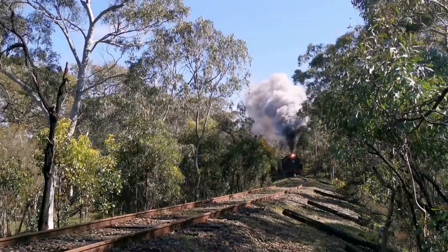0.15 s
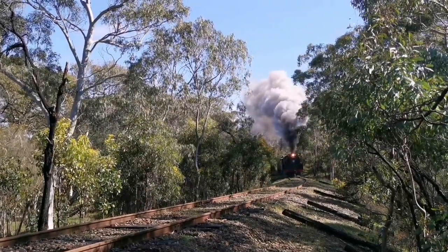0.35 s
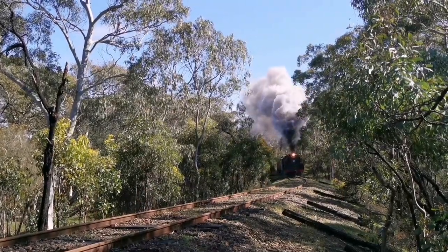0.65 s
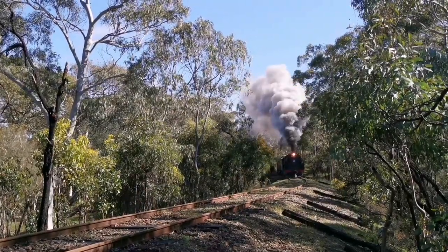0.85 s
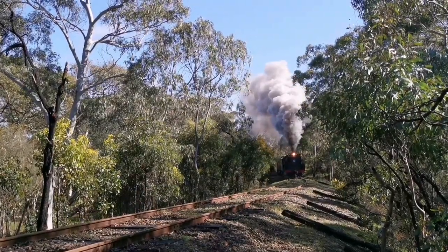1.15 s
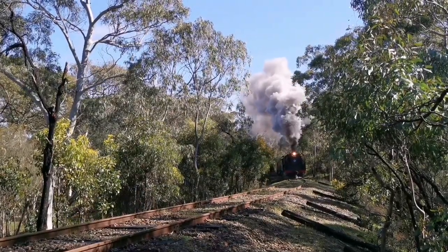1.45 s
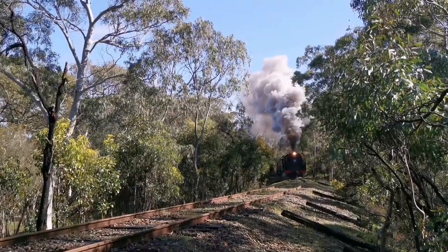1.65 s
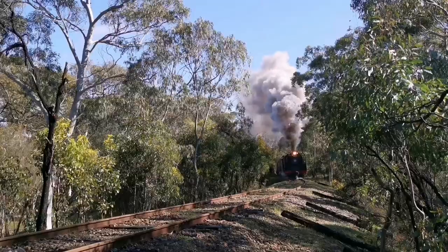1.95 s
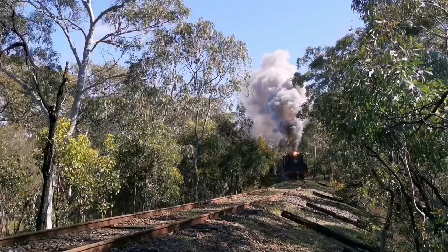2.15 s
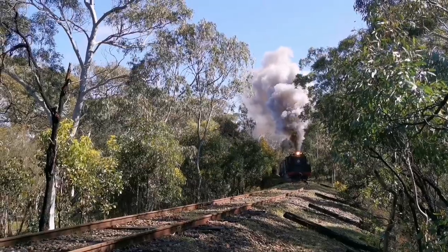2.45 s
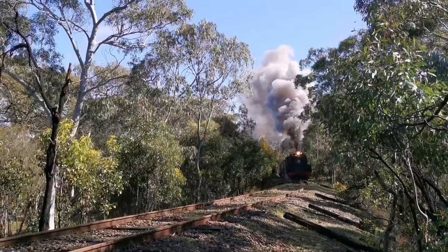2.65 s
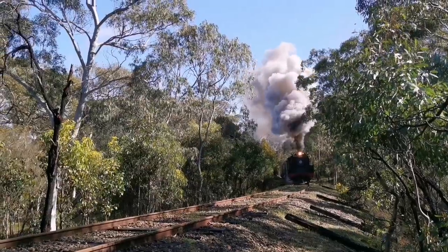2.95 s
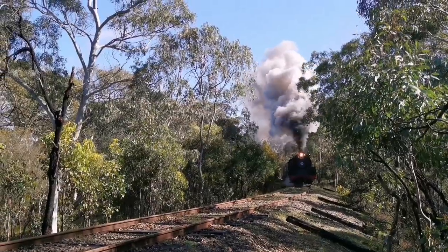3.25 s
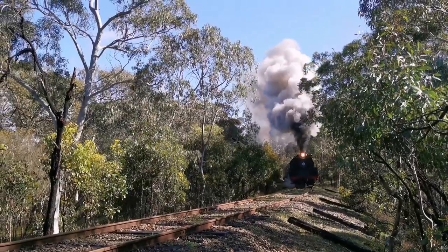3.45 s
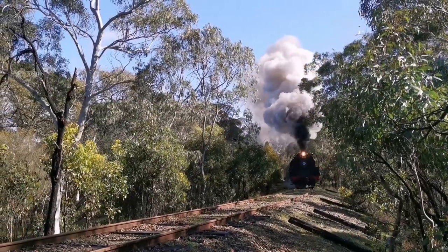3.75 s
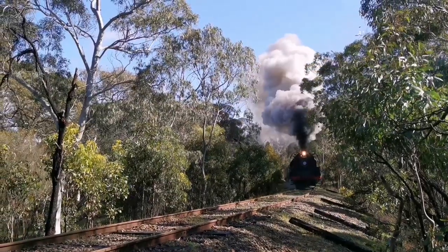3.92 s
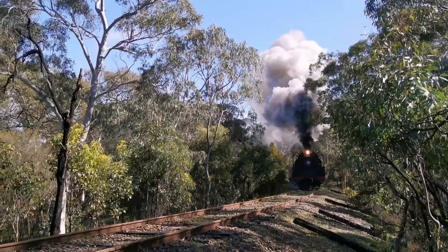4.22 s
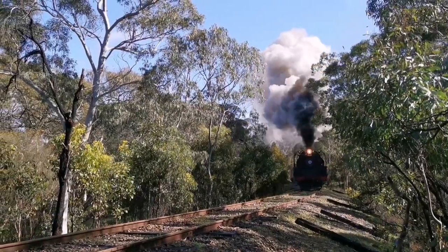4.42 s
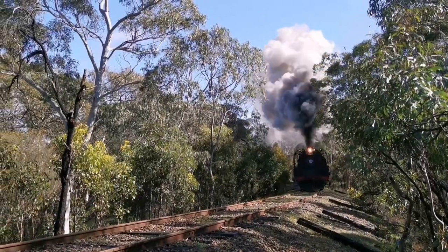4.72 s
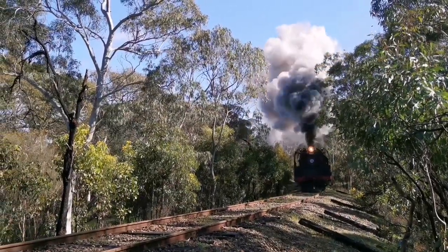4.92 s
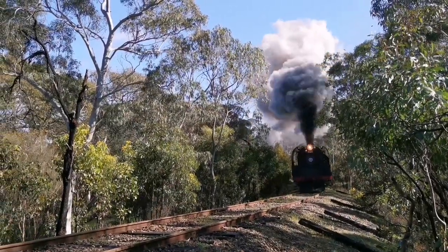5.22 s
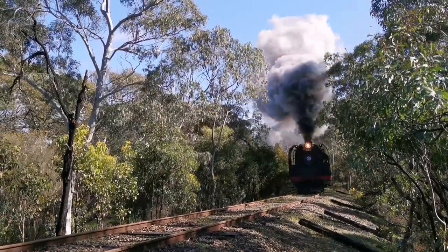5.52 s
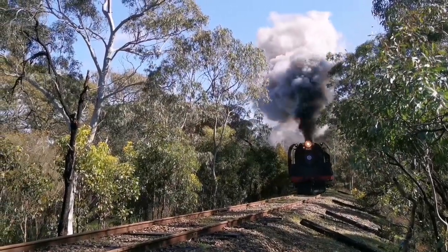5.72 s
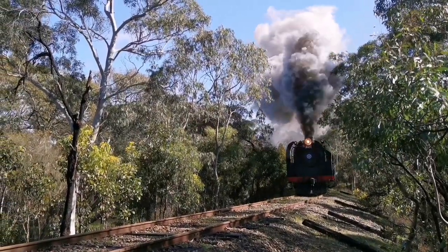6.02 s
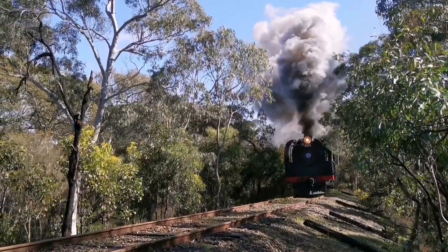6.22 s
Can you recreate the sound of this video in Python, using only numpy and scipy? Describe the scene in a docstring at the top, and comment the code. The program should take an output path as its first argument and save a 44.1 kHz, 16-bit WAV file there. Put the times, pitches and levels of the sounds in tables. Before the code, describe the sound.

Fast, breathy steam exhaust beats with hollow chimney booms, every second of four slightly weaker, slowly growing louder above low train rumble in woodland.

```python
"""A steam locomotive works up a grade towards the microphone beside a wooded line: 5.5 exhaust beats a second,
four to a turn of the wheels with the second one weak.
Each beat is a rush of steam (gated, filtered noise) and a boom of the smokebox and chimney (ringing noise and a
sine note). The bush answers with decaying noise echoes; the train rumbles and roars underneath, with a few thumps.
Reflections off the ground and trunks ripple the steam's spectrum, and its hiss leans to the right."""
import sys
import numpy as np
from scipy import signal
from scipy.fft import rfft, irfft, next_fast_len
from scipy.io import wavfile
from scipy.ndimage import uniform_filter1d, map_coordinates

SR = 44100
rng = np.random.default_rng(int(sys.argv[2]) if len(sys.argv) > 2 else 0)


def to_wav(sig):
    """Store sig (one row per channel, or 1-D mono) as 16-bit WAV at the path in sys.argv[1].

    Samples outside -1..1 are clipped; the rate is SR.
    """
    pcm = np.clip(np.atleast_2d(sig), -1, 1) * 32767
    pcm = np.round(pcm).astype(np.int16)
    wavfile.write(sys.argv[1], SR, pcm.T)  # frames by channels


N = 280910  # length in samples

# The four beats of one wheel turn, unequal as the valves are set; levels are before the mix gains:
# (lateness t/s, valve opening t/s, full blast t/s, blast level/dB, extra hiss level/dB,
#  delay of the boom t/s, boom level/dB)
STROKES = [(-.001, 0.03606, 0.026, -31.5, 0.75, 0.046, -33.5),
           (-.0067, 0.0376, 0.03, -34, -2.5, 0.047, -35), (.002, 0.0378, 0.028, -32, 0.74, 0.051, -33.5),
           (-.0006, 0.03244, .025, -33, 0.7, 0.046, -34)]
# Beats that stand out from the pattern: (t/s, extra blast level/dB, extra hiss level/dB, extra boom level/dB)
ACCENTS = [(.54, -0.4, 1, 1), (.9, -2.3, 0.8, -4.5), (1.08, 1.9, -1.1, 1.5), (3.07, -2, 0, 1.5),
           (4.16, -1.5, 1, 0.5), (4.34, -1.1, 1.2, -4.5), (5.06, -3.1, 4, 1), (5.24, -0.6, 1.8, -5.5)]
# How hard the steam blows: (t/s, added blast level/dB)
EFFORT = [(0, 0), (2.2, 0.42), (4.2, 0), (5.6, 1), (6.37, 0.6)]
# Steam spectrum common to both ears, and differing between them: (f/Hz, relative level/dB per Hz)
BLAST_MID = [(300, -19), (700, -2), (1200, -8), (1900, -4), (3000, -20), (4300, -22), (5600, -14),
             (6900, -24), (7700, -38), (11000, -33), (12300, -49.5), (13000, -65)]
BLAST_SIDE = [(300, -35), (700, -14.5), (1200, -5), (1900, -11.5), (3000, -13.5), (4300, -17.5),
              (5600, -16.5), (6900, -27.5), (7700, -38), (11000, -32.5), (12300, -49), (13000, -65)]
# Peaks and notches from near reflections, same two parts: (centre f/Hz, half-width at 1/e f/Hz, level/dB)
RIPPLE_MID = [(976, 72.6, -17.5), (1172, 117, 4.5), (1603, 28.5, -34), (2190, 233, -5.5), (2436, 78, 7.5),
              (2836, 100, 8.5), (2856, 47, -9), (3390, 44, 6), (5000, 110, -1.5)]
RIPPLE_SIDE = [(1010, 180, -7), (1354, 61, -17), (1590, 150, 2), (1810, 61, -8.9), (2095, 74, -9),
               (2290, 96, 7), (2500, 44, -15), (3140, 380, 3)]
# Sideways lean of the steam: (f/Hz, pull to the left, negative to the right, limited to +-0.99 in use)
LEAN = [(200, 0.68), (400, 0.97), (700, -1.1), (1200, 0.77), (1600, -0.28), (1900, 0.43), (2500, 0.33),
        (3400, 0.036), (4200, -0.23), (4900, -.63), (5600, -0.99), (7000, -0.83), (8000, -1.02)]
# Smokebox and chimney resonances: (f/Hz, bandwidth f/Hz, relative level/dB)
CHIMNEY = [(153.7, 43, -9.5), (200.8, 17.15, -2), (232.9, 13, -6.5)]
# Dying away of the answer from the trees: (f/Hz, time to fall 60 dB t/s)
BUSH_DECAY = [(150, 0.73), (700, 0.88), (2500, 0.48), (10000, 0.61)]
# Spectra of the rolling train: (f/Hz, relative level/dB per Hz)
RUMBLE = [(12, -32), (26, 1), (40, -7), (70, -2), (115, -5.5), (170, -6), (290, -20), (450, -67.5)]
ROAR = [(200, -17), (320, 2.5), (420, 5.5), (700, 5.5), (850, 3), (970, -2), (1200, -7), (1900, -5.5),
        (3000, -11), (6000, -18.5), (8000, -48)]
# Dull low thumps: (onset t/s, peak level/dB, f/Hz)
THUMPS = [(0.978, -24.5, 85.5), (1.64, -21.5, 80.5), (5.282, -28, 75.6)]

BEAT_S = 0.18078  # steady time from one exhaust beat to the next
# no two beats are quite alike: standard deviations
SCATTER_S, BLAST_SCATTER_DB, HISS_SCATTER_DB, BOOM_SCATTER_DB = 0.00092, 0.3, 0.95, 0.5
OPENING_SCATTER = 0.158  # share by which a valve opens faster or slower than usual
NOTE_HZ, NOTE_SCATTER = 202.85, 0.034  # hollow chimney note, and the share by which it varies between beats
# growth of each sound as the engine nears
HISS_DB_PER_S, BOOM_DB_PER_S, RUMBLE_DB_PER_S, ROAR_DB_PER_S = 0.19, 1.37, 0.49, 0.89
RUMBLE_START_DB, ROAR_START_DB = -38, -48
TOP_HZ = 15700  # upper band limit at the microphone


def beats():
    """The four strokes come round with the wheels; returns the steam puffs and the booms that follow them."""
    puffs, booms = [], []
    accents = {round(s / BEAT_S): extra for s, *extra in ACCENTS}
    count = int(N / SR / BEAT_S) + 1
    for k, (jitter, strong, bright, deep, slow) in enumerate(rng.standard_normal((count, 5))):
        late, rise, hold, db, hiss_db, delay, boom_db = STROKES[k % len(STROKES)]
        db, hiss_db, boom_db = np.add((db, hiss_db, boom_db), accents.get(k, 0))
        half_open = k * BEAT_S + late + SCATTER_S * jitter
        rise = rise * np.exp(OPENING_SCATTER * slow)
        start = half_open - rise / 2
        db = db + np.interp(half_open, *np.transpose(EFFORT)) + BLAST_SCATTER_DB * strong
        hiss_db = hiss_db + HISS_DB_PER_S * half_open + HISS_SCATTER_DB * bright
        boom_db = boom_db + BOOM_DB_PER_S * half_open + BOOM_SCATTER_DB * deep
        puffs.append((start, rise, hold, db, hiss_db))
        booms.append((start, delay + rise / 2, boom_db))
    return puffs, booms


def exhaust(puffs, fall_db_per_s, leak_db):
    """Strength of the jet and of its hiss: each valve opening rises, holds and dies away over a steady leak."""
    t = np.arange(N) / SR
    power, hiss_power = np.zeros((2, N)) + amp(leak_db) ** 2
    for s, rise, hold, db, hiss_db in puffs:
        closing_s = np.maximum(t - s - rise - hold, 0)
        flow = np.clip((t - s) / rise, 0, 1) * amp(db - fall_db_per_s * closing_s)
        power = power + flow ** 2
        hiss_power = hiss_power + (flow * amp(hiss_db)) ** 2
    return np.sqrt(power), np.sqrt(hiss_power)


def blast(flow, hiss, flutter_db, clearing_db_per_s, diffuse, wet_db):
    """The turbulent jet of steam leaves the chimney and reaches both ears."""
    t = np.arange(N) / SR

    def treble(hz):
        return hz ** 4 / (hz ** 4 + 3800 ** 4)

    def body(hz):  # the narrow jet radiates no bass
        return (1 - treble(hz)) * hz ** 4 / (hz ** 4 + 200 ** 4)

    def highest(hz):
        return hz ** 8 / (hz ** 8 + 8000 ** 8)

    jet = patchy(rng.standard_normal((2, N)), depth_db=2.5, size=(5, 9))
    jet = jet * amp(flutter_db * wobble(170))  # eddies tear the jet
    jet = filtered(jet * flow, body) + filtered(jet * hiss, treble)
    # the air takes less of the highest hiss as the engine nears
    clearing = amp(clearing_db_per_s * (t - t.mean()))
    jet = jet + filtered(jet, highest) * (clearing - 1)
    direct, scattered = jet + amp(wet_db) * bush(jet[0])

    # the ears differ in level, in phase (a quarter turn at all frequencies) and by scattered sound
    share = np.clip(diffuse, 0, 1)

    def lean(hz):
        return np.clip(along(LEAN, hz), -0.99, 0.99)

    def rest(hz):
        return np.sqrt(1 - lean(hz) ** 2)

    side = filtered(direct, lambda hz: lean(hz) + 1j * rest(hz) * np.sqrt(1 - share))
    side = side + np.sqrt(share) * filtered(scattered, rest)
    mid = filtered(direct, lambda hz: rippled(BLAST_MID, RIPPLE_MID, hz))
    side = filtered(side, lambda hz: rippled(BLAST_SIDE, RIPPLE_SIDE, hz))
    return np.array([mid + side, mid - side])


def boom(booms, swell_s, fade_s, edge_hz, note_db, wet_db):
    """Every slug of steam sets the gas in the smokebox and chimney ringing."""
    t = np.arange(SR // 3) / SR

    def resonances(f):
        total = 0
        for k, (centre, width, db) in enumerate(CHIMNEY):
            damping = 1j * f * width
            total = total + (-1) ** k * amp(db) * damping / (centre * centre - f * f + damping)
        return total / (1 + (f / edge_hz) ** 8)

    track = np.zeros(N)
    for s, delay, db in booms:
        ring = unit(filtered(rng.standard_normal(SR // 2), resonances)[-len(t):])
        # partly even out the loudness of the ringing noise
        ring = ring / np.sqrt(np.abs(signal.hilbert(ring)) + 0.61)
        note_hz = NOTE_HZ * (1 + NOTE_SCATTER * rng.standard_normal())
        note = np.sin(2 * np.pi * (note_hz * t + rng.random()))
        ring = unit(ring) + amp(note_db) * unit(note)
        swell = np.exp(np.minimum((t - delay) / swell_s, (delay - t) / fade_s))
        swell = swell * np.minimum(t / 0.017, 1)  # soft start
        add(track, s, amp(db) * unit(ring * swell))
    return (track + amp(wet_db) * bush(track)[0]) * amp([[0.5], [-0.5]])  # slightly left


def bush(x):
    """Two unrelated answers from the trees, each frequency dying at its own speed."""
    hz, t, z = signal.stft(rng.standard_normal((2, SR)), SR, nperseg=256)
    decay = amp(-60 * t / along(BUSH_DECAY, hz)[:, None])
    build_up = 1 - np.exp(-t / 0.0058)
    tail = signal.istft(z * decay * build_up, SR, nperseg=256)[1]
    return signal.fftconvolve(x[None], tail / np.linalg.norm(tail[0]), axes=1)[:, :N]


def rolling(flow, throb, lumps_db):
    """Wheels and fire rumble, throbbing with the draught, and the rails roar faintly."""
    t = np.arange(N) / SR
    draught = unit(1 + throb * unit(flow))
    rumble_gain = amp(RUMBLE_START_DB + RUMBLE_DB_PER_S * t + lumps_db * wobble(12))
    rumble = rumble_gain * draught * rush(RUMBLE, side_db=-18.5)
    roar_gain = amp(ROAR_START_DB + ROAR_DB_PER_S * t + 1.85 * wobble(8.4))
    roar = roar_gain * patchy(rush(ROAR, side_db=-7), depth_db=3.0, size=(2, 16))
    # the rumble sits to the left, the roar to the right
    return rumble * amp([[1], [-1.2]]) + roar * amp([[-1.2], [1.2]])


def thumps(life_s):
    """Dull pushes of air that last about one cycle."""
    t, track = np.arange(SR // 8) / SR, np.zeros(N)
    for s, db, hz in THUMPS:
        envelope = t / life_s * np.exp(1 - t / life_s)
        add(track, s, amp(db) * np.sin(2 * np.pi * hz * t) * envelope)
    return track


def rush(spectrum, side_db):
    """Stereo noise of rms 1 with the given spectrum; side_db sets how far the ears differ."""
    mid, side = filtered(rng.standard_normal((2, N)), lambda hz: amp(along(spectrum, hz)))
    side = amp(side_db) * side
    return unit(np.array([mid + side, mid - side]))


def patchy(x, depth_db, size):
    """x at rms 1 with random gain in patches of size (frequency bins, frames)."""
    z = signal.stft(x, nperseg=512)[2]
    field = uniform_filter1d(rng.standard_normal(z.shape[-2:]), size[0], 0)
    field = uniform_filter1d(field, size[1], 1)
    return unit(signal.istft(z * amp(depth_db * unit(field)), nperseg=512)[1][..., :N])


def wobble(rate):
    """A smooth random curve, rate knots a second."""
    knots = rng.standard_normal(int(N * rate / SR) + 4)
    return map_coordinates(knots, [np.arange(N) * rate / SR])


def rippled(spectrum, ripples, hz):
    """Gain of a smooth spectrum with peaks and notches."""
    ripple_db = sum(db * np.exp(-((hz - c) / w) ** 2) for c, w, db in ripples)
    return amp(along(spectrum, hz) + ripple_db)


def along(points, hz):
    """Interpolate (f/Hz, value) points on a log frequency axis."""
    f, v = np.transpose(points)
    return np.interp(np.log(hz + 1), np.log(f + 1), v)


def filtered(x, response):
    """Filter x by a real or complex response of frequency."""
    n = x.shape[-1]
    m = next_fast_len(n + SR // 4)
    return irfft(rfft(x, m) * response(np.fft.rfftfreq(m, 1 / SR)), m)[..., :n]


def add(track, s, sound):
    """Mix a sound into the track from time s on."""
    start = round(s * SR)
    part = sound[max(-start, 0):max(N - start, 0)]
    track[max(start, 0):][:len(part)] += part


def amp(db):
    """Decibels to gain."""
    return 10 ** (np.asarray(db) / 20)


def unit(x):
    """x at rms 1."""
    return x / np.sqrt(np.mean(x ** 2) + 1e-20)


def scene():
    """The exhaust over the noise of the rolling train."""
    puffs, booms = beats()
    flow, hiss = exhaust(puffs, fall_db_per_s=184, leak_db=-53.5)
    steam = blast(flow, hiss, flutter_db=0.57, clearing_db_per_s=1.5, diffuse=0.73, wet_db=-11)
    chimney = boom(booms, swell_s=0.036, fade_s=0.033, edge_hz=510, note_db=-6.5, wet_db=-10)
    train = rolling(flow, throb=0.76, lumps_db=2.0)
    return amp(13.0) * steam + amp(-6.5) * chimney + train + thumps(life_s=0.0035)


def record(dry):
    """The microphone chain keeps nothing above its band limit."""
    return filtered(dry, lambda hz: hz < TOP_HZ)


dry = scene()
out = record(dry)
to_wav(out)
```